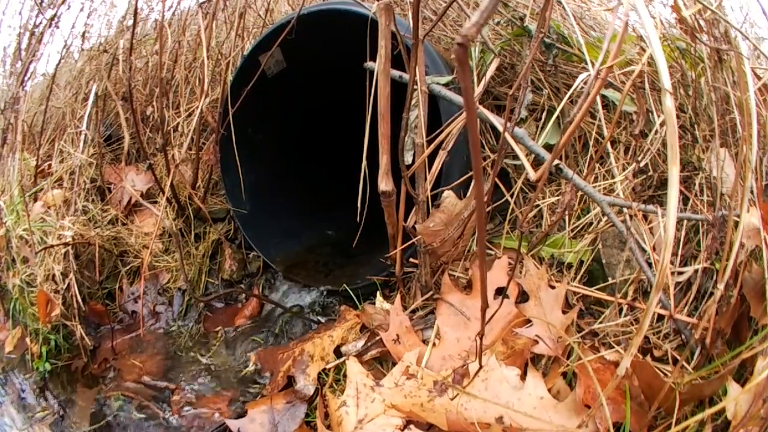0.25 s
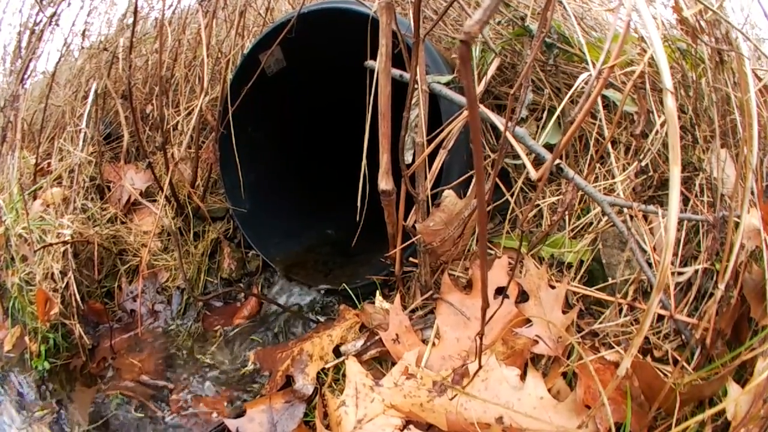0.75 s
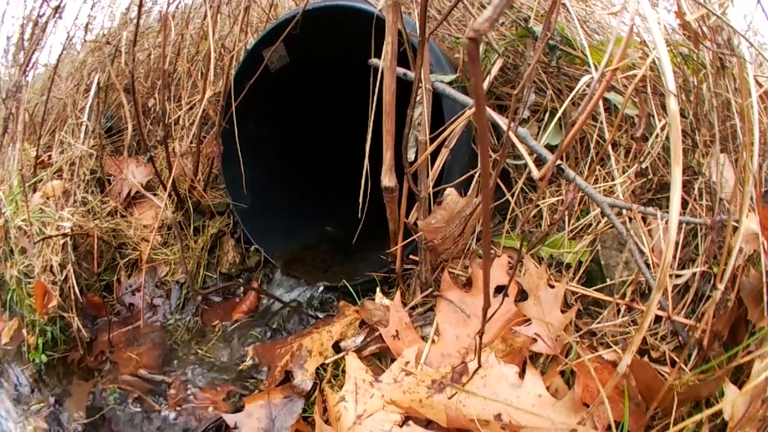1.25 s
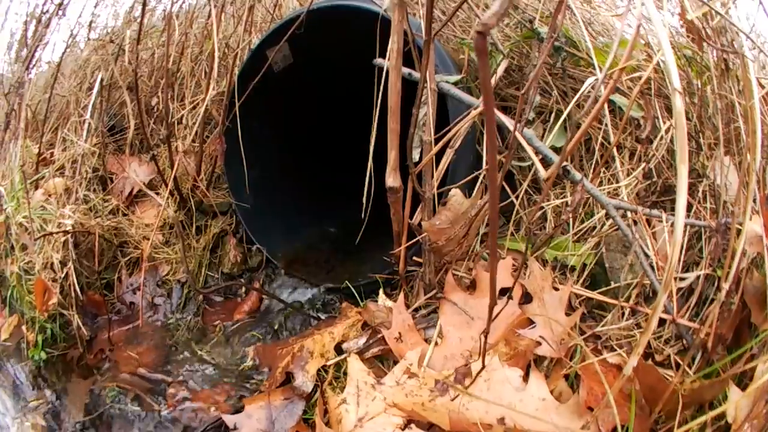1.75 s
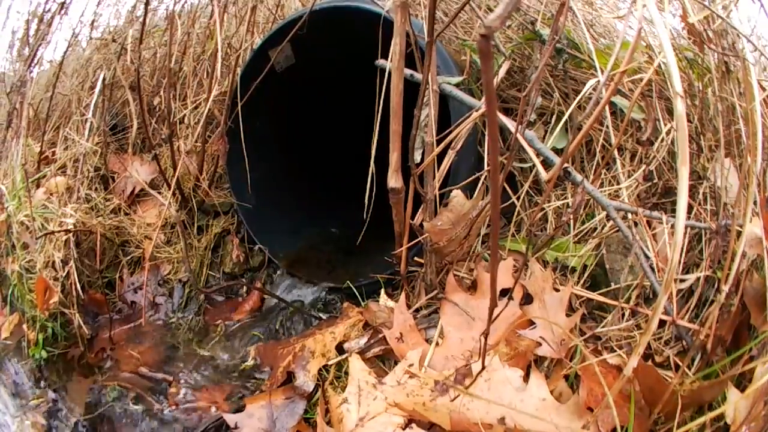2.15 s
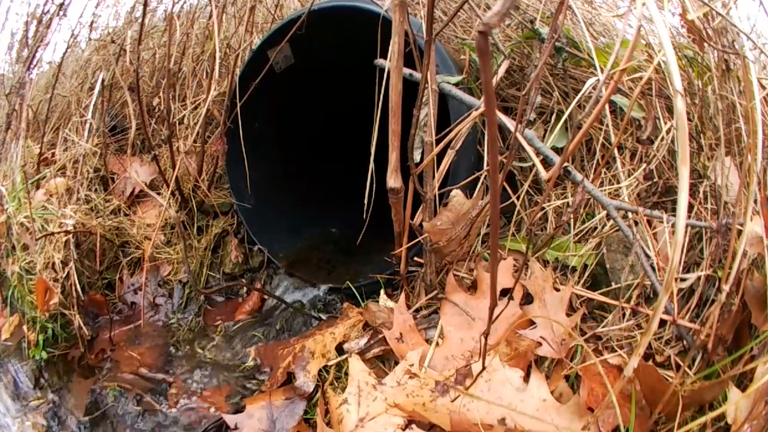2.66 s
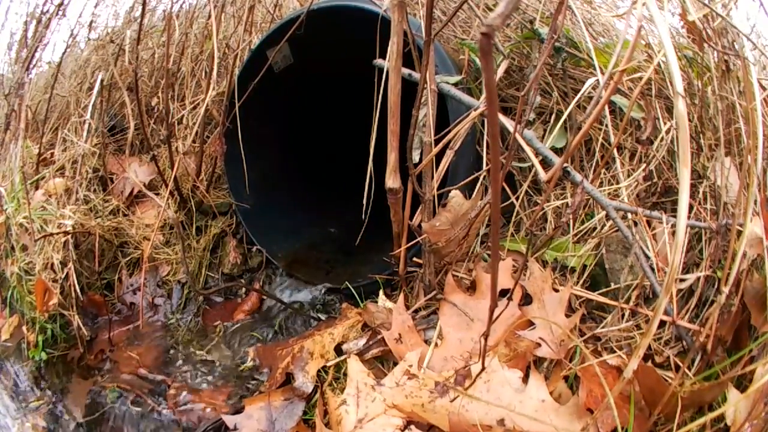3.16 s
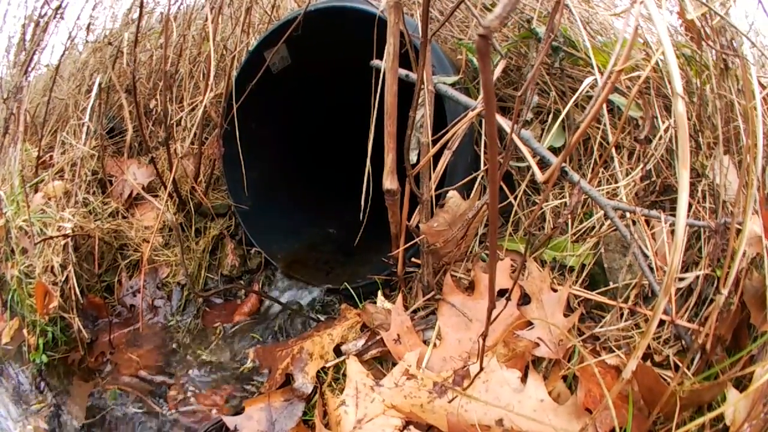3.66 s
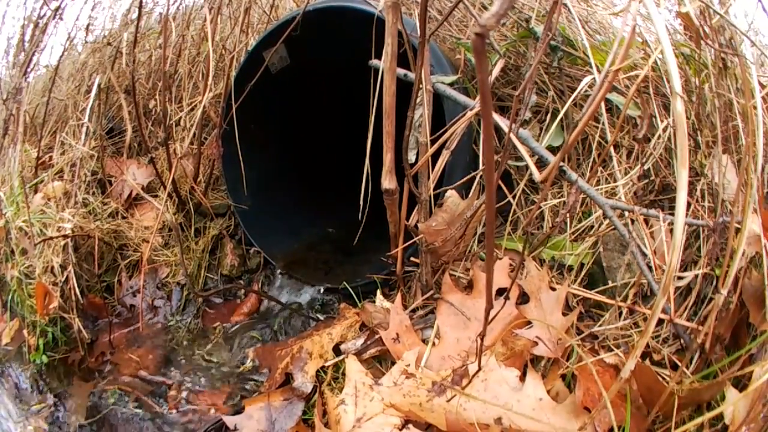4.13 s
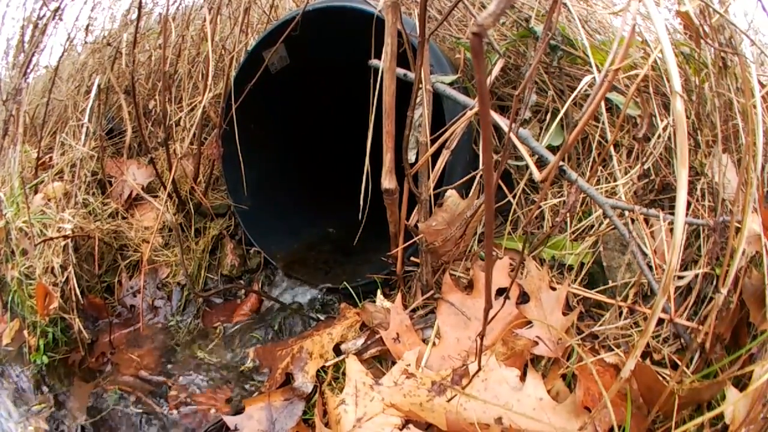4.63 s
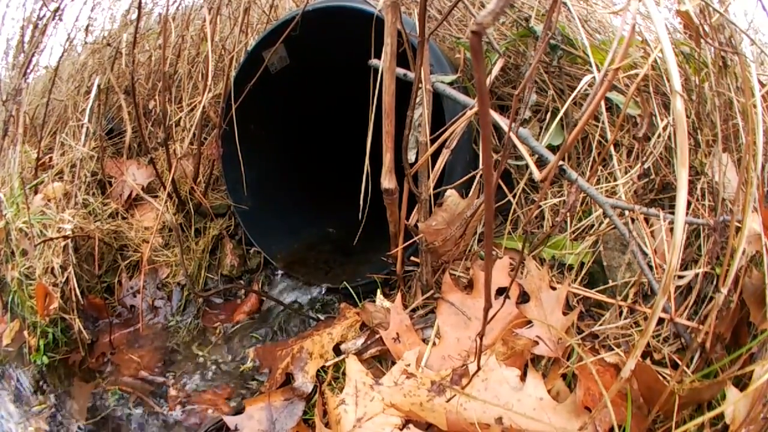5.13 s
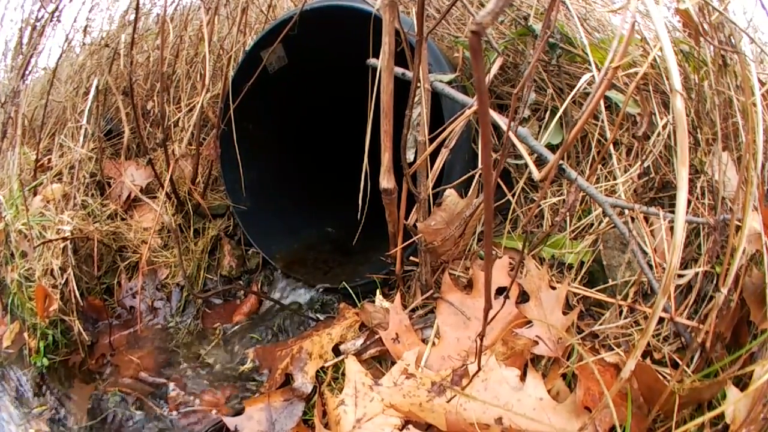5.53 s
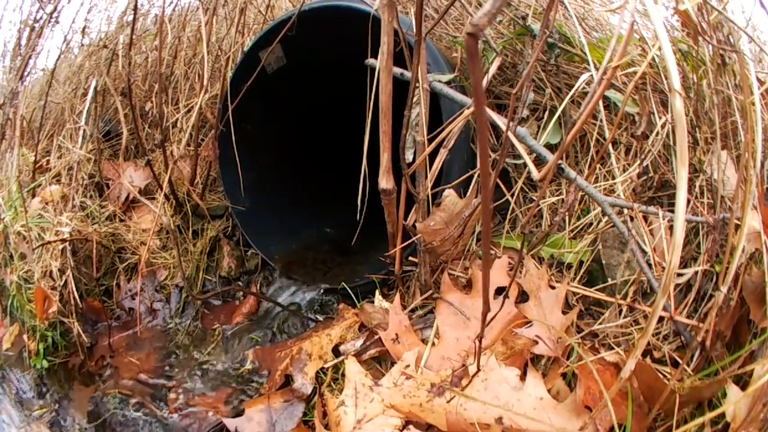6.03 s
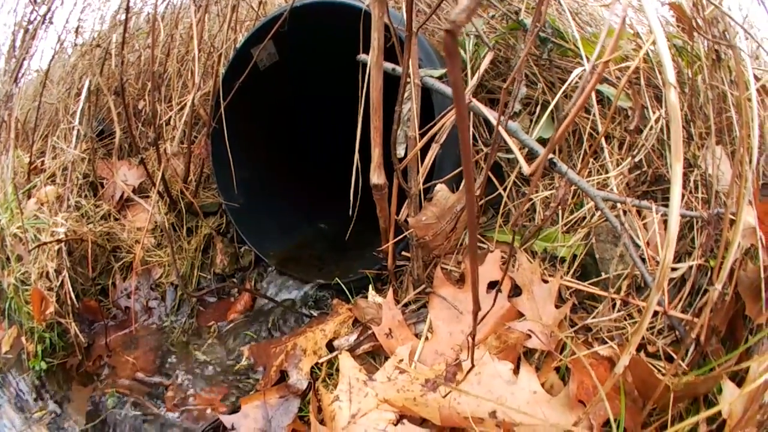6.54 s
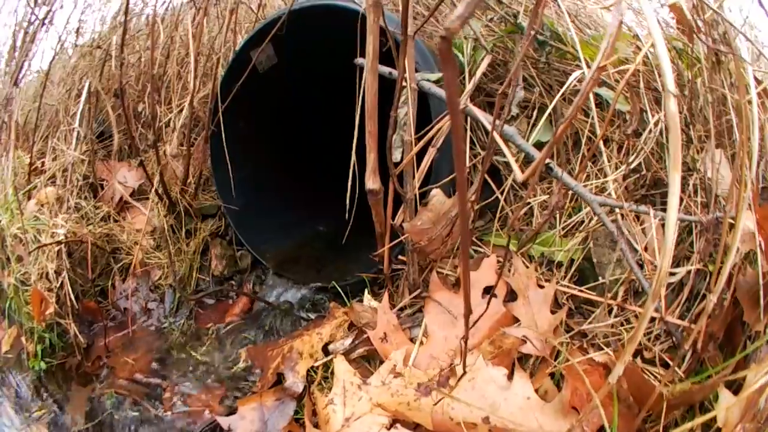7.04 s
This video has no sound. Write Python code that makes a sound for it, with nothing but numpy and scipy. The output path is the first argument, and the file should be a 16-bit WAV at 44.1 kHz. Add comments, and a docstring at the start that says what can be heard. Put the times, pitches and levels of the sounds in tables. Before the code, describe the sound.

A close, light trickle of water gurgles and patters on wet leaves to the left, over a very faint distant rumble.

```python
"""Water runs from a plastic drain pipe over wet leaves into a shallow pool, close by on the left.
Each splash traps air bubbles that ring as damped oscillators; some glide up in pitch until they burst.
Flung droplets tick on the leaves, and the pipe mouth and the bank return short reflections.
A faint rumble, hum and drone come from far away; a few soft, low knocks sound under the water."""
import sys
import numpy as np
from scipy import signal
from scipy.fft import rfft, irfft, next_fast_len
from scipy.io import wavfile
from scipy.ndimage import map_coordinates

SR = 44100
rng = np.random.default_rng(int(sys.argv[2]) if len(sys.argv) > 2 else 0)


def master_out(mix):
    """Clip the mix to full scale and print it as 16-bit PCM to the path in sys.argv[1]."""
    frames = np.transpose(np.atleast_2d(mix))
    ceiling = np.clip(frames, -1, 1)
    pcm = np.round(ceiling * 32767).astype(np.int16)
    wavfile.write(sys.argv[1], SR, pcm)


N = 321489

# Levels in the tables are relative: gains and filters follow.
# Loudest bubbles: start_s, level_db, pitch_hz, t60_s, rise_factor, onset_cycles
LOUD_BUBBLES = [(0.01, -31.5, 4660, 0.0036, 0.033, 1.3), (0.0294, -35.5, 1740, 0.029, 0.15, 0.3),
                (0.0342, -19, 4950, 0.0015, 0.03, 5.5), (0.0413, -37, 900, 0.12, 0.43, 0.43),
                (0.0507, -30, 2890, 0.027, 0.03, 0.3), (0.072, -28, 4670, 0.0055, 0.03, 1.6),
                (0.101, -37, 1214, 0.049, 0.85, 1.2), (0.132, -32, 5080, 0.003, 0.3, 0.3),
                (0.1336, -37.5, 900, 0.026, 0.24, 0.35), (0.156, -32, 3420, 0.005, 0.03, 0.3),
                (0.1755, -26.5, 4570, 0.0032, 0.4, 0.3), (0.1905, -26, 5610.0, 0.0015, 0.03, 1.5),
                (0.2017, -29, 4660, 0.0055, 0.03, 0.3), (0.213, -36.5, 2170, 0.021, 0.028, 0.26),
                (0.2364, -36.5, 810, 0.023, 0.027, 0.23), (0.243, -33.5, 5300, 0.0075, 0.03, 1.5),
                (0.343, -32, 1940, 0.021, 0.15, 0.37), (0.39, -33.5, 1590, 0.013, 0.3, 0.3),
                (0.3977, -33.5, 3340.0, 0.019, 0.15, 0.3), (0.427, -19.5, 4740, 0.0013, 0.03, 0.3),
                (0.455, -42, 1200, 0.04, 0.03, 0.3), (0.462, -25, 6160, 0.0062, 0.03, 0.3),
                (0.4959, -23, 5060.0, 0.0027, 0.03, 6.0), (0.524, -38.5, 1123, 0.054, 0.57, 0.3),
                (0.553, -31, 2440, 0.025, 0.03, 0.26), (0.6858, -25, 4280, 0.0091, 0.03, 1.5),
                (0.7078, -19.5, 4400, 0.002, 0.03, 0.29), (0.7388, -30, 4860, 0.0029, 0.03, 1.5),
                (0.771, -16.5, 5200, 0.0014, 0.03, 1.4), (0.7978, -35.5, 1400, 0.015, 0.03, 0.3),
                (0.829, -22.5, 2600, 0.009, 0.26, 0.36), (0.8303, -25, 6260, 0.0018, 0.79, 0.33),
                (0.8456, -33, 4770, 0.01, 0.15, 1.5), (0.8882, -35, 2460, 0.011, 0.3, 6.0),
                (0.8905, -37.5, 1705, 0.019, 0.32, 6.0), (0.938, -31, 4160, 0.0051, 0.03, 1.3),
                (0.9601, -45, 1295, 0.042, 0.026, 6.0), (0.9902, -30, 3920, 0.0042, 0.44, 0.34),
                (0.9895, -31, 2500, 0.018, 0.03, 0.3), (1.004, -28, 4890.0, 0.003, 0.03, 6.0),
                (1.057, -38, 4900, 0.0053, 0.03, 1.5), (1.0379, -27, 4350, 0.003, 0.03, 0.44),
                (1.038, -24.5, 2600, 0.012, 0.03, 0.66), (1.0674, -27.5, 3470, 0.012, 0.03, 0.3),
                (1.08, -35, 1580.0, 0.011, 0.82, 1.2), (1.099, -35.5, 940, 0.014, 0.28, 0.3),
                (1.109, -41, 1680, 0.03, 0.03, 0.3), (1.123, -27.5, 6370, 0.0051, 0.15, 0.41),
                (1.1445, -30.5, 5100, 0.0028, 0.03, 0.37), (1.146, -39, 1160, 0.016, 0.74, 5.5),
                (1.2003, -35.0, 1770, 0.026, 0.036, 0.3), (1.217, -39.5, 1050, 0.035, 0.03, 0.3),
                (1.2515, -31.5, 5200, 0.011, 0.15, 0.3), (1.2851, -26.5, 5670, 0.0059, 0.15, 1.6),
                (1.304, -38, 1170, 0.03, 0.03, 0.24), (1.3093, -23, 4830, 0.0034, 0.03, 0.31),
                (1.3437, -37, 1610, 0.023, 0.41, 6.0), (1.357, -29, 5550, 0.011, 0.03, 0.33),
                (1.3659, -34.5, 1410, 0.024, 0.03, 0.33), (1.3749, -29, 4210, 0.011, 0.03, 0.3),
                (1.414, -32, 1850, 0.011, 0.03, 0.43), (1.4478, -32, 6400, 0.0026, 0.03, 6.0),
                (1.5072, -28, 5550, 0.0023, 0.03, 0.33), (1.5224, -33.5, 6200, 0.0039, 0.03, 5.4),
                (1.5793, -24, 6400, 0.0017, 0.027, 0.3), (1.6195, -31.5, 5830, 0.0087, 0.15, 6.0),
                (1.6215, -36.5, 2100, 0.025, 0.9, 8.4), (1.638, -22, 4700, 0.0023, 0.15, 0.3),
                (1.68, -37, 1210, 0.0098, 0.03, 0.18), (1.7026, -24, 5740, 0.0021, 0.03, 1.5),
                (1.711, -31.5, 1160, 0.019, 0.034, 0.26), (1.7485, -30, 5000, 0.012, 0.15, 0.3),
                (1.7494, -29, 3010.0, 0.0044, 0.9, 0.33), (1.7577, -28.5, 4780, 0.0033, 0.03, 0.33),
                (1.8213, -29.5, 1280, 0.0042, 0.03, 0.22), (1.825, -45, 1450, 0.053, 1, 8),
                (1.843, -30, 3130, 0.005, 0.03, 0.3), (1.908, -30.5, 6170, 0.007, 0.03, 0.26),
                (1.9566, -20, 4720.0, 0.0027, 0.028, 6.0), (2.0073, -31.5, 2920, 0.0029, 0.03, 6.6),
                (2.035, -31, 6860, 0.0032, 0.03, 6.0), (2.0399, -26, 4580, 0.011, 0.033, 0.3),
                (2.0518, -24.5, 6200, 0.0009, 0.03, 1.5), (2.0703, -36, 2660, 0.0085, 0.03, 6.0),
                (2.123, -31, 3350, 0.012, 0.15, 0.3), (2.143, -33.5, 3570, 0.018, 0.15, 0.3),
                (2.159, -43, 1680, 0.025, 0.027, 5.6), (2.1863, -37, 1690, 0.021, 0.03, 0.3),
                (2.232, -34, 2950, 0.006, 0.03, 0.3), (2.295, -24, 5300, 0.0025, 0.63, 0.38),
                (2.3231, -24, 3480, 0.0033, 0.34, 1.2), (2.3244, -40, 1650, 0.038, 0.03, 0.29),
                (2.3561, -24, 7070, 0.005, 0.024, 0.27), (2.3853, -25.5, 5170, 0.0026, 0.03, 0.3),
                (2.421, -25, 5760, 0.0023, 0.74, 0.41), (2.5037, -32.5, 1745, 0.019, 0.17, 6.0),
                (2.518, -34, 1860, 0.021, 0.15, 0.3), (2.533, -27, 3380, 0.0058, 0.03, 0.38),
                (2.534, -36, 1415, 0.021, 0.03, 0.3), (2.5417, -33, 2300, 0.014, 0.03, 0.3),
                (2.603, -31, 2520, 0.036, 0.03, 0.28), (2.6258, -26.5, 5300, 0.0041, 0.03, 0.36),
                (2.6285, -35, 2070, 0.029, 0.85, 6.0), (2.6383, -37, 6600, 0.0087, 0.03, 0.3),
                (2.6508, -27.5, 6070, 0.005, 0.03, 0.33), (2.6714, -30, 4000, 0.0066, 0.03, 0.3),
                (2.6883, -22.5, 7140, 0.0018, 0.03, 0.3), (2.7154, -31, 3570, 0.01, 0.15, 0.3),
                (2.7317, -19, 4930, 0.0025, 0.35, 1.5), (2.7533, -37, 1018, 0.082, 0.14, 0.34),
                (2.8, -36, 3340.0, 0.017, 0.15, 1.7), (2.8751, -22, 3180, 0.0015, 0.24, 0.24),
                (2.9145, -37, 1900, 0.0087, 0.035, 0.3), (2.92, -39, 1200, 0.0089, 0.3, 0.27),
                (2.948, -25, 3300, 0.013, 0.03, 0.26), (2.97, -24.5, 4600, 0.0025, 0.03, 1.5),
                (2.996, -27, 5760, 0.005, 0.03, 6.0), (3.035, -39, 1530, 0.014, 0.36, 1.4),
                (3.04, -29, 4270, 0.004, 0.03, 0.3), (3.0985, -18, 4250, 0.0023, 0.03, 0.36),
                (3.102, -36, 1610, 0.017, 0.3, 0.3), (3.1353, -24, 3430, 0.01, 0.14, 0.32),
                (3.15, -31, 3800, 0.004, 0.03, 0.3), (3.175, -28, 2600, 0.0046, 0.03, 1.3),
                (3.1752, -23, 4730, 0.0016, 0.8, 0.3), (3.216, -43, 780, 0.03, 0.18, 1.5),
                (3.223, -27, 3300, 0.0059, 0.3, 0.22), (3.2243, -41, 1630, 0.043, 0.26, 1.3),
                (3.229, -30.5, 4640.0, 0.0048, 0.82, 6.0), (3.246, -43, 775, 0.03, 0.17, 1.8),
                (3.255, -38, 1425, 0.018, 0.03, 0.27), (3.2727, -23.5, 4800, 0.0025, 0.03, 0.77),
                (3.342, -34, 6670.0, 0.0058, 0.15, 6.0), (3.368, -36.5, 2230, 0.012, 0.03, 0.3),
                (3.4333, -32, 2720, 0.015, 0.03, 0.3), (3.4733, -38, 1330, 0.015, 0.24, 0.33),
                (3.484, -27, 2840, 0.012, 0.03, 0.3), (3.4916, -33, 5100, 0.011, 0.15, 0.3),
                (3.506, -32, 4480.0, 0.0089, 0.03, 0.3), (3.54, -22, 8650.0, 0.0014, 0.83, 1.5),
                (3.54, -28.5, 3330, 0.0049, 0.03, 0.3), (3.554, -22, 7400, 0.0059, 0.3, 0.37),
                (3.5571, -31, 2260, 0.04, 0.03, 0.59), (3.573, -19, 5000, 0.0021, 0.82, 2.3),
                (3.615, -41, 1900, 0.026, 0.3, 6.0), (3.6777, -36.5, 1210, 0.042, 0.028, 0.3),
                (3.681, -23, 5030, 0.0025, 0.03, 0.23), (3.693, -29, 2820, 0.0052, 0.03, 0.3),
                (3.7134, -31, 3150, 0.0042, 0.14, 1.5), (3.7171, -27, 5070, 0.0024, 0.2, 1.5),
                (3.7463, -24.5, 3100, 0.0085, 0.3, 0.3), (3.7556, -26.5, 6070, 0.0057, 0.14, 1.5),
                (3.7836, -34.5, 1355, 0.053, 0.99, 0.27), (3.832, -30.5, 2780, 0.006, 0.03, 0.3),
                (3.8454, -31, 1790, 0.03, 0.15, 0.43), (3.8592, -36, 3700, 0.013, 0.15, 6.0),
                (3.862, -41, 1250, 0.03, 0.44, 0.3), (3.9246, -31.5, 890, 0.0078, 0.03, 1.6),
                (3.94, -32, 5550, 0.0056, 0.03, 6.0), (3.9791, -20.5, 5560, 0.0024, 0.03, 2),
                (3.9897, -29, 4770, 0.0089, 0.15, 0.3), (3.9905, -24.5, 2820, 0.0037, 0.03, 0.33),
                (4.0233, -32.5, 3920, 0.015, 0.3, 0.3), (4.0255, -41, 757, 0.087, 0.028, 0.28),
                (4.0254, -32, 4990, 0.004, 0.73, 0.3), (4.0524, -33, 5370, 0.0031, 0.03, 1.5),
                (4.0624, -38, 1670.0, 0.029, 0.3, 0.3), (4.085, -33.5, 2280, 0.018, 0.03, 0.38),
                (4.132, -28, 6400, 0.0013, 0.99, 6.0), (4.1344, -20, 3870, 0.0029, 0.14, 0.22),
                (4.135, -34.0, 1590, 0.038, 0.13, 0.38), (4.232, -40, 2570, 0.019, 0.03, 6.0),
                (4.269, -33, 1366, 0.032, 0.58, 0.51), (4.3672, -35, 2000, 0.014, 0.26, 0.34),
                (4.372, -26, 5800, 0.0012, 0.13, 6.0), (4.4481, -42, 1220.0, 0.035, 0.03, 4.8),
                (4.4675, -36, 1040, 0.022, 0.03, 0.33), (4.4824, -31.5, 4140, 0.0088, 0.03, 0.3),
                (4.5086, -29, 6450.0, 0.0043, 0.03, 1.5), (4.5443, -33, 5060, 0.0057, 0.49, 0.34),
                (4.546, -25.5, 2740, 0.021, 0.03, 0.23), (4.5594, -30, 3270, 0.019, 0.03, 0.33),
                (4.5748, -17.5, 3150, 0.0019, 0.03, 0.093), (4.609, -29, 5080, 0.003, 0.03, 0.3),
                (4.6222, -31.5, 2170, 0.01, 0.03, 0.27), (4.6382, -30, 4470, 0.0041, 0.27, 0.3),
                (4.6717, -30.5, 2750, 0.011, 0.03, 6.0), (4.6728, -22.5, 6340, 0.0051, 0.44, 0.37),
                (4.7164, -32.5, 3180, 0.011, 0.26, 6.0), (4.7193, -35.5, 4720.0, 0.0082, 0.03, 1.5),
                (4.7594, -27.5, 4450, 0.0039, 0.78, 6.0), (4.7936, -28.5, 3880, 0.0024, 0.03, 6.0),
                (4.813, -27.5, 4940, 0.004, 0.39, 6.0), (4.8613, -27.5, 3100, 0.0038, 0.03, 1.5),
                (4.8792, -27, 4850, 0.0031, 0.83, 0.3), (4.9253, -22, 4200, 0.0025, 0.03, 1.3),
                (4.946, -30, 2670, 0.006, 0.03, 0.3), (4.9787, -27.5, 3300, 0.0046, 0.14, 6.0),
                (4.996, -38, 1100, 0.014, 0.03, 0.33), (5.0044, -29, 5030, 0.0019, 0.79, 0.25),
                (5.005, -26.5, 2380, 0.01, 0.15, 0.3), (5.039, -23, 4800, 0.0042, 0.03, 0.27),
                (5.0393, -29.5, 1480, 0.0049, 0.16, 1.5), (5.0421, -25.5, 2730, 0.0039, 0.81, 6.0),
                (5.123, -29.5, 4800, 0.0085, 0.26, 0.3), (5.1661, -25.5, 3460, 0.019, 1, 0.3),
                (5.1866, -28.5, 2580, 0.012, 0.96, 0.13), (5.2406, -26, 5100, 0.0092, 0.13, 0.26),
                (5.241, -36.5, 1080, 0.016, 0.03, 0.42), (5.26, -29, 4200, 0.0083, 0.03, 0.33),
                (5.2905, -34.5, 1650, 0.014, 0.3, 0.94), (5.3334, -30, 5200, 0.011, 0.15, 0.3),
                (5.3368, -26.5, 1780, 0.0058, 0.03, 0.46), (5.358, -22, 3280, 0.0036, 0.34, 5.4),
                (5.4036, -27, 6050, 0.0058, 0.9, 0.3), (5.4032, -28, 2650, 0.028, 0.16, 0.3),
                (5.4217, -22.5, 5800, 0.0022, 0.42, 1.7), (5.438, -30, 7200, 0.008, 0.03, 0.3),
                (5.4735, -20, 4460, 0.0064, 0.15, 0.37), (5.493, -28, 2660.0, 0.012, 0.03, 0.34),
                (5.499, -30, 4560.0, 0.0082, 0.55, 6.0), (5.5758, -40, 1150, 0.014, 0.028, 6.7),
                (5.6452, -37, 1720, 0.01, 0.03, 6.0), (5.645, -25, 3340, 0.0027, 0.03, 0.35),
                (5.693, -27, 3300, 0.0092, 0.19, 0.3), (5.7125, -40, 1560, 0.03, 0.03, 6.0),
                (5.7131, -30, 4400.0, 0.0037, 0.9, 1.5), (5.729, -27.5, 5800, 0.0043, 0.15, 0.3),
                (5.7507, -39, 1370, 0.032, 0.4, 6.0), (5.7525, -32, 6500, 0.0087, 0.03, 0.3),
                (5.7798, -40.5, 1240, 0.051, 0.027, 5.4), (5.7819, -23, 6230, 0.0028, 0.03, 6.0),
                (5.7844, -35, 2020.0, 0.0087, 0.55, 6.0), (5.828, -31.5, 3150, 0.027, 0.25, 0.26),
                (5.838, -36, 1610, 0.028, 0.27, 0.34), (5.8382, -24, 4890.0, 0.0017, 0.9, 0.3),
                (5.891, -26.5, 7100, 0.0052, 0.15, 6.0), (5.9703, -31, 3820, 0.0027, 0.28, 1.5),
                (5.9974, -27, 5800, 0.0043, 0.03, 1.5), (6.083, -29, 5150, 0.004, 0.03, 0.3),
                (6.1028, -32, 2050, 0.024, 0.03, 0.3), (6.109, -26, 5800, 0.0027, 0.15, 1.5),
                (6.148, -34.5, 1640, 0.019, 0.49, 6.0), (6.181, -31.0, 6300, 0.0057, 0.03, 1.4),
                (6.1875, -32, 2280, 0.013, 0.34, 0.28), (6.2045, -33.5, 1460, 0.024, 0.03, 0.22),
                (6.215, -28, 6000, 0.0063, 0.03, 0.3), (6.239, -37, 1650, 0.02, 0.46, 6.0),
                (6.2482, -28.5, 2330, 0.019, 0.03, 0.32), (6.2486, -24.5, 5470, 0.003, 0.15, 0.35),
                (6.253, -34, 1526, 0.027, 0.5, 5.5), (6.2978, -33, 2570, 0.0059, 0.03, 0.34),
                (6.299, -22.5, 4950, 0.0084, 0.03, 2.3), (6.331, -35, 6200, 0.0063, 0.03, 6.0),
                (6.3672, -29, 1970, 0.0056, 0.03, 0.27), (6.455, -33, 2530, 0.026, 0.03, 0.37),
                (6.4741, -27, 2670, 0.012, 0.03, 0.35), (6.4763, -34.5, 1520, 0.033, 0.38, 0.36),
                (6.5198, -28, 3110.0, 0.014, 0.98, 6.6), (6.522, -32.5, 1400, 0.044, 0.03, 0.37),
                (6.5298, -27, 4000, 0.0036, 0.15, 6.0), (6.546, -30, 3360, 0.005, 0.03, 0.3),
                (6.5625, -36, 6450.0, 0.0036, 0.03, 6.0), (6.5663, -29, 4150, 0.006, 0.03, 0.3),
                (6.587, -32, 4150, 0.0097, 0.03, 1.5), (6.597, -41, 1040, 0.024, 0.15, 1.5),
                (6.615, -26, 6240, 0.0087, 0.03, 0.33), (6.621, -32.5, 3340.0, 0.018, 0.03, 0.3),
                (6.6502, -23.5, 5240, 0.0054, 0.03, 0.3), (6.6948, -33.5, 2590, 0.014, 0.03, 0.3),
                (6.7603, -29, 8000, 0.0058, 0.03, 0.3), (6.847, -28, 1140, 0.055, 0.36, 0.21),
                (6.8467, -28, 5200, 0.0085, 0.33, 0.3), (6.8712, -25.5, 4930, 0.0018, 0.03, 1.5),
                (6.9297, -30, 3530, 0.019, 0.78, 0.3), (6.929, -26, 5370, 0.0021, 0.9, 0.33),
                (6.956, -39.5, 1280, 0.031, 0.4, 0.33), (6.9662, -28, 2400.0, 0.0048, 0.35, 1.5),
                (6.97, -26.5, 6340.0, 0.0018, 0.03, 6.0), (6.9819, -24, 6140, 0.0019, 0.03, 0.3),
                (7.0269, -28, 1370, 0.0076, 0.03, 0.34), (7.0607, -28, 3120, 0.0054, 0.03, 0.3),
                (7.084, -27, 5130, 0.0024, 0.03, 0.27), (7.139, -26.5, 3950, 0.0031, 0.68, 1.5),
                (7.161, -22.5, 6230.0, 0.0021, 0.63, 0.28), (7.1878, -31.5, 915, 0.025, 0.5, 0.3),
                (7.208, -34, 2040, 0.0053, 0.03, 6.0), (7.2563, -17.5, 6600, 0.0015, 0.03, 6.0)]
# Strength of the flow over the leaves: time_s, level_db
FLOW_STRENGTH = [(0.0, -50), (0.45, -45), (0.95, -51.5), (1.42, -46), (2.17, -47), (2.39, -53),
                 (2.54, -47.5), (3.53, -48.5), (3.69, -45.5), (4.02, -49), (4.2, -48), (4.69, -47.5),
                 (5.28, -47.5), (5.68, -46), (6.09, -46), (6.42, -43), (6.78, -47.5), (7.29, -44)]
# Bubbles that glide to the surface and burst: start_s, level_db, pitch_hz, length_s, climb_octaves
GLIDING_BUBBLES = [(0.548, -31.5, 3077, 0.0067, 1.55), (0.739, -45.5, 1000, 0.016, 0.52),
                   (0.951, -34, 2280, 0.0067, 1.2), (1.014, -34, 2450, 0.007, 1.3),
                   (1.934, -30.5, 1534, 0.0083, 0.84), (2.694, -38.5, 2740, 0.006, 0.75),
                   (2.855, -39, 3100, 0.0044, 0.75), (2.9685, -30.5, 1090, 0.0036, 1.1),
                   (3.3444, -38, 2540, 0.013, 0.54), (3.956, -39, 2980, 0.0055, 0.44),
                   (4.171, -31, 2860, 0.0043, 1.6), (5.713, -29, 2720, 0.0028, 1.3),
                   (6.083, -30, 1600, 0.0087, 0.55), (6.367, -32, 1670, 0.0084, 0.51),
                   (6.602, -28.5, 4020, 0.006, 0.56), (6.639, -38, 960, 0.015, 0.5),
                   (7.159, -39.5, 1250, 0.007, 0.84)]
# Loudest droplets striking the leaves: start_s, level_db
LOUD_DROPLETS = [(0.592, -24), (0.6374, -24.5), (0.6543, -19.5), (0.691, -22), (0.769, -32), (0.867, -19),
                 (0.9897, -24), (1.037, -22), (1.062, -28), (1.1004, -23.5), (1.1233, -32), (1.2895, -23),
                 (1.5475, -24.5), (1.5786, -26.5), (1.6787, -26), (1.8835, -23), (2.0238, -29),
                 (2.419, -26), (2.4428, -34), (2.4587, -17.5), (2.6873, -20.5), (2.9695, -26),
                 (3.034, -23.5), (3.0659, -28), (3.19, -24), (3.483, -24), (3.5389, -21), (3.5754, -25),
                 (4.3311, -24.5), (4.3566, -24), (4.4032, -24), (4.412, -24), (4.6172, -23.5), (4.676, -30),
                 (4.8355, -22), (4.8474, -24), (5.004, -24), (5.1068, -28), (5.329, -33), (5.6875, -25),
                 (5.889, -19), (6.2198, -25), (6.299, -20.5), (6.4083, -18.5), (6.4267, -26), (6.464, -23),
                 (6.9656, -29), (7.0274, -24.5), (7.0354, -25), (7.0605, -13), (7.1546, -20)]
# Swells of the far hum: middle_s, half_width_s, level_db
HUM_SWELLS = [(0.4, 0.14, -61), (0.89, 0.25, -51.5), (1.47, 0.2, -58), (2.32, 0.34, -57.5)]
# Soft, low knocks: start_s, level_db
LOW_KNOCKS = [(1.635, -48), (1.679, -56), (1.704, -58), (1.734, -56), (1.744, -54), (1.779, -55),
              (1.819, -57)]
# Spectrum of splashing water: frequency_hz, gain_db
WASH_SPECTRUM = [(300, -21), (600, -39.5), (850, 0.5), (1300, -14.5), (2200, -5), (4800, -4), (7000, -7),
                 (9000, -13), (16000, -16.5)]
# Spectrum of an impact on a wet leaf: frequency_hz, gain_db
TICK_SPECTRUM = [(500, -54), (1500, -16), (3000, -0.5), (6000, 9.5), (9000, 7), (12000, 7.5), (16000, 5.5)]
# Radiation of the shallow pool, weak in the bass: frequency_hz, gain_db
POOL_RADIATION = [(200, -45.5), (450, -4.5), (640, -1), (820, -1.5), (1150, 0.7), (1700, 0.2), (2600, 0.3),
                  (5000, 0)]
# Reflection from the pipe mouth and bank: frequency_hz, gain_db
BANK_SPECTRUM = [(300, -13), (1200, 9), (5000, 1.5), (14000, -1.5)]
# Spectrum of the far rumble: frequency_hz, gain_db
RUMBLE_SPECTRUM = [(20, -26), (35, -23), (55, -17), (75, -7.5), (110, 3.5), (180, 0), (270, -7),
                   (320, -15.5), (600, -14.5), (1200, -39), (4000, -58)]
# Spectrum of the rumble's slow swell: frequency_hz, gain_db
RUMBLE_SWELL_SPECTRUM = [(20, -44), (60, -19), (120, -7.5), (190, 0), (280, -1.5), (330, -9), (600, -12),
                         (1200, -48), (4000, -65)]
# Spectrum of the deep drone: frequency_hz, gain_db
DRONE_SPECTRUM = [(20, -33), (55, -12), (72, 6), (90, -1), (140, -20), (400, -61)]
# Spectrum of a knock: frequency_hz, gain_db
KNOCK_SPECTRUM = [(60, -22), (150, 0), (280, -2), (450, -8), (800, -17), (2000, -50)]
# Bands that the ditch and the microphone housing lift or absorb: centre_hz, width_hz, gain_db
DITCH_BANDS = [(1310, 160, 2.5), (1794, 73, 5.5), (1893, 105, -4.5), (2300, 167, -5), (2880, 30, -1),
               (3080, 46, -9.5), (3310, 60, 3), (3995, 58, -14), (4190, 62, 3), (4880, 310, 3),
               (6100, 210, 1.5), (7735, 180, -18), (8730, 140, -8.5)]
# Level difference between the channels: frequency_hz, left_minus_right_db
BALANCE = [(60, 7.5), (200, 10), (380, 5), (700, 7.5), (1300, 10.5), (2400, 10), (4400, 11), (8000, 12),
           (15000, 14)]

PLOP_SPREAD_DB, SPRAY_SPREAD_DB = 12, 17  # range of random strength among grains
PINCH_GAIN, PINCH_SHARPEN, PINCH_CYCLES = 0.8, 0.16, 2.6  # a new bubble starts loud and sharp
RISE_ACCELERATION, MAX_RISE_FACTOR = 1.3, 0.85


def amp(db):
    """Amplitude ratio of a level in decibels."""
    return 10 ** (np.asarray(db) / 20)


def unit(x):
    """Normalisation to an rms of 1."""
    return x / np.sqrt(np.mean(x ** 2) + 1e-20)


def along(points, hz):
    """Interpolation of a spectrum on a logarithmic frequency axis."""
    frequencies, values = np.transpose(points)
    return np.interp(np.log(hz + 1), np.log(frequencies + 1), values)


def wobble(rate):
    """Smooth random modulation: a spline through rate knots a second."""
    knots = rng.standard_normal(int(N * rate / SR) + 4)
    return map_coordinates(knots, [np.arange(N) * rate / SR])


def swell(middle_s, half_width_s):
    """Gaussian envelope of height 1."""
    return np.exp(-((np.arange(N) / SR - middle_s) / half_width_s) ** 2)


def coloured(x, gain_db):
    """Minimum-phase filtering by gain_db(hz), built by folding the cepstrum."""
    m = 2 * next_fast_len(N // 2 + SR // 4)
    cepstrum = irfft(np.log(amp(gain_db(np.fft.rfftfreq(m, 1 / SR)))), m)
    cepstrum[1:m // 2] *= 2
    cepstrum[m // 2 + 1:] = 0
    return irfft(rfft(x, m) * np.exp(rfft(cepstrum)), m)[..., :N]


def shaped(x, spectrum):
    """Filtering by a tabulated spectrum."""
    return coloured(x, lambda hz: along(spectrum, hz))


def placed(start_s, grains):
    """Superposition of grains, one a row, each at its start time."""
    at = np.round(start_s * SR).astype(int)[:, None] + np.arange(grains.shape[1])
    return np.bincount(at.ravel(), grains.ravel(), N)[:N]


def staggered(offsets):
    """Stratified timing: one start in each equal slot of the scene, in seconds."""
    return (np.arange(len(offsets)) + offsets) / len(offsets) * (N - 1) / SR


def ring(hz, t60, rise, onset_cycles, size):
    """Damped oscillation of bubbles: pitch settles after pinch-off, then climbs near the surface."""
    t = np.arange(size) / SR
    hz, t60, rise = hz[:, None], t60[:, None], rise[:, None]
    pinch = np.exp(-t * hz / PINCH_CYCLES) / (1 + onset_cycles)
    age = np.minimum(t / t60, 1)
    attack = 1 - np.exp(-t * hz / onset_cycles)
    envelope = np.exp(-np.log(1000) * t / t60) * attack * (1 + PINCH_GAIN * pinch)
    pitch = hz * (1 + PINCH_SHARPEN * pinch + rise * age * (1 + RISE_ACCELERATION * age))
    phase = 2 * np.pi * np.cumsum(pitch, axis=1) / SR
    return envelope / envelope.max(axis=1, keepdims=True) * np.sin(phase)


def snaps(count, t60, size=256):
    """Broadband transients of peak 1, as when a film of water breaks."""
    burst = rng.standard_normal((count, size)) * np.exp(-np.log(1000) * np.arange(size) / SR / t60)
    return burst / np.abs(burst).max(axis=1, keepdims=True)


def jostle(depth_db=2.2):
    """Amplitude modulation by the rushing water makes a ring ragged."""
    return amp(depth_db * np.tanh(wobble(520)))


def near_bubbles(bubbles, ring_db, snap_db):
    """Pinch-off excites each bubble's resonance; the more abrupt the onset, the stronger the snap."""
    start_s, db, hz, t60, rise, onset = bubbles.T
    peak, onset = amp(db)[:, None], onset[:, None]
    rings = placed(start_s, peak * ring(hz, t60, rise, onset, size=2600))
    snapping = placed(start_s, peak / (1 + onset) * snaps(len(start_s), t60=0.0026))
    return amp(ring_db) * jostle() * rings + amp(snap_db) * shaped(snapping, WASH_SPECTRUM)


def ring_time(hz):
    """Damping grows with frequency: the t60 in seconds is shorter for small, high bubbles."""
    return 0.0164 * (hz / 2000) ** -1.33


def shed_bubbles(within_s, level_db, max_octaves):
    """Fragmentation: each loud bubble sheds a smaller, higher one. Returns bubble rows."""
    parent_s, parent_db, parent_hz, _, _, onset = np.transpose(LOUD_BUBBLES)
    when, smaller, strength, lift = rng.random((len(parent_s), 4)).T
    start_s = parent_s + within_s * when ** 2
    db = parent_db + level_db + 6 * (strength - 0.5)
    hz = parent_hz * 2 ** (max_octaves * smaller)
    return np.transpose([start_s, db, hz, 0.5 * ring_time(hz), MAX_RISE_FACTOR * lift ** 2, onset])


def lesser_bubbles(low_hz, high_hz, db_per_octave, count):
    """Chance entrainment of air: the smaller the bubble, the harder it starts. Returns bubble rows."""
    when, smaller, strength, life, lift = rng.random((count, 5)).T
    hz = low_hz * (high_hz / low_hz) ** smaller
    db = -43.5 + db_per_octave * np.log2(hz / 2000) + 2 * (2 * strength - 1)
    t60 = ring_time(hz) * 2 ** (life - 0.5)
    return np.transpose([staggered(when), db, hz, t60, MAX_RISE_FACTOR * lift, np.ones(count)])


def surges(splash_db, settle_s, churn_db):
    """Agitation in dB jumps with each loud bubble and relaxes exponentially, over a random churn."""
    start_s = np.array(LOUD_BUBBLES)[:, 0]
    fade = np.exp(-np.arange(SR // 15) / SR / settle_s)
    splashes = np.tanh(placed(start_s, np.tile(fade, (len(start_s), 1))))
    churn = np.tanh(0.41 * wobble(55) + 0.5 * wobble(150))
    return splash_db * splashes + churn_db * churn


def flow(depth=0.47):
    """Slow amplitude modulation: the small bubbling follows the strength of the flow."""
    level_db = np.interp(np.arange(N) / SR, *np.transpose(FLOW_STRENGTH))
    return amp(depth * (level_db - level_db.mean()))


def swarm(surge_db, spread_db, band_hz, cycles, rise, count, size):
    """Many small resonators add incoherently; smaller bubbles ring higher and shorter."""
    when, smaller, life, lift, strength = rng.random((count, 5)).T
    start_s = staggered(when)
    low_hz, high_hz = band_hz
    hz = low_hz * (high_hz / low_hz) ** smaller
    t60 = cycles * 2 ** (2 * life - 1) / hz
    db = spread_db * strength ** 2 + surge_db[(start_s * SR).astype(int)]
    peak = amp(db) * (hz / low_hz) ** 0.38  # short rings start harder
    rings = ring(hz, t60, rise * lift * life, onset_cycles=1.0, size=size)
    return unit(placed(start_s, peak[:, None] * rings))


def spray(surge_db, count):
    """Impact noise of fine spray pattering on the leaves."""
    when, strength = rng.random((count, 2)).T
    peak = amp(SPRAY_SPREAD_DB * strength ** 3)[:, None]
    ticks = placed(when * N / SR, peak * snaps(count, t60=0.0077))
    return unit(shaped(ticks * amp(surge_db), TICK_SPECTRUM))


def spatter(count):
    """Impact without resonance: small drops smack the water and trap no air."""
    when, strength = rng.random((count, 2)).T
    peak = amp(SPRAY_SPREAD_DB * strength ** 4)[:, None]
    ticks = placed(when * (N - 1) / SR, peak * snaps(count, t60=0.0023))
    return unit(shaped(ticks, WASH_SPECTRUM))


def water():
    """Bubbles and impacts superpose and radiate from the pool, over a surging wash of noise."""
    shed = shed_bubbles(within_s=0.012, level_db=-10.5, max_octaves=1.08)
    lesser = lesser_bubbles(low_hz=1218, high_hz=7160, db_per_octave=5.5, count=130)
    surge = surges(splash_db=14, settle_s=0.0014, churn_db=9)
    hollow = amp(-75) * swarm(0.5 * surge, PLOP_SPREAD_DB, band_hz=(420, 720),
                              cycles=9, rise=0.3, count=130, size=2600)
    plops = amp(-76.5) * swarm(0.5 * surge, PLOP_SPREAD_DB, band_hz=(580, 1020),
                               cycles=4.6, rise=0.25, count=300, size=2600)
    gurgle = amp(-58) * swarm(0.44 * surge, PLOP_SPREAD_DB, band_hz=(860, 2104),
                              cycles=25, rise=1.3, count=900, size=2000)
    tinkle = amp(-52.5) * swarm(surge, SPRAY_SPREAD_DB, band_hz=(2376, 6950),
                                cycles=27, rise=1.17, count=2800, size=480)
    fizz = amp(-56) * swarm(1.03 * surge, SPRAY_SPREAD_DB, band_hz=(7900, 15900),
                            cycles=43, rise=0.1, count=2400, size=256)
    patter = amp(-56.5) * spray(0.27 * surge, count=2200)
    wash = amp(-64 + 1.48 * surge) * unit(shaped(rng.standard_normal(N), WASH_SPECTRUM))
    splashes = near_bubbles(np.vstack([LOUD_BUBBLES, shed, lesser]), ring_db=-0.17, snap_db=-2.5)
    splashes += amp(-0.5) * glides(low_hz=1100, high_hz=4600, cycles=15, faint_count=28)
    splashes += droplets(centre_hz=11740, ping_db=-3.8, slap_db=-7.2, faint_count=8)
    smacks = amp(-53) * spatter(count=1200)
    bubbling = flow() * (hollow + plops + gurgle + tinkle + smacks)
    return shaped(splashes + bubbling + fizz + patter, POOL_RADIATION) + wash


def bank_reflections(x, t60, apart_db, hop=2048):
    """Scattering off the pipe mouth and bank, along paths that change as the splashes move about."""
    starts = np.arange(0, N, hop)
    padded = np.pad(x, (0, 2 * hop))
    frames = padded[starts[:, None] + np.arange(2 * hop)] * signal.get_window("hann", 2 * hop)
    t = np.arange(2 * hop) / SR
    fade = np.exp(-np.log(1000) * t / t60) * (1 - np.exp(-t / 0.00028))
    # left and right share nearly the same paths
    paths = rng.standard_normal(frames.shape) + amp(apart_db) * rng.standard_normal((2, *frames.shape))
    echoes = signal.fftconvolve(frames[None], paths * fade / np.linalg.norm(fade), axes=2)
    return shaped(np.array([placed(starts / SR, side) for side in echoes]), BANK_SPECTRUM)


def far_rumble():
    """Low noise, partly coherent between the channels, wavers; a second band swells and recedes."""
    air = rng.standard_normal(N) + 0.47 * rng.standard_normal((2, N))
    resting = amp(-66.5 + 2.1 * wobble(13)) * unit(shaped(air, RUMBLE_SPECTRUM))
    envelope = amp(-68.5 + 2.1 * wobble(12)) * swell(middle_s=1.4, half_width_s=2.76)
    return resting + envelope * unit(shaped(rng.standard_normal(N), RUMBLE_SWELL_SPECTRUM))


def far_drone():
    """Narrow-band noise gives a deep drone that swells once, near the end."""
    level_db = -79 + 8.5 * swell(middle_s=6.93, half_width_s=0.3)
    return amp(level_db) * unit(shaped(rng.standard_normal(N), DRONE_SPECTRUM))


def glides(low_hz, high_hz, cycles, faint_count, size=1100):
    """A bubble's resonance sweeps upward as it is carried to the surface, and stops as it bursts."""
    when, smaller, strength, lift = rng.random((faint_count, 4)).T
    faint_hz = low_hz * (high_hz / low_hz) ** smaller
    faint_db = -43.5 + 6 * (strength + smaller - 1)
    faint = np.transpose([staggered(when), faint_db, faint_hz, cycles / faint_hz, (1 + lift) / 2])
    start_s, db, hz, length_s, octaves = np.vstack([GLIDING_BUBBLES, faint]).T
    progress = np.minimum(np.arange(size) / SR / length_s[:, None], 1)
    envelope = np.sqrt(np.abs(np.sin(np.pi * progress))) * np.exp(-progress)
    pitch = hz[:, None] * 2 ** (octaves[:, None] * progress ** 1.5)
    chirps = envelope / envelope.max() * np.sin(2 * np.pi * np.cumsum(pitch, axis=1) / SR)
    return jostle() * placed(start_s, amp(db)[:, None] * chirps)


def far_hum(start_hz, climb_hz_per_s):
    """A sine tone, randomly modulated in level and frequency, creeps upward as it comes and goes."""
    swells = sum(amp(db) * swell(middle, width) for middle, width, db in HUM_SWELLS)
    waver = amp(-4 + 1.6 * wobble(12.8))
    hz = start_hz + climb_hz_per_s * np.arange(N) / SR + 1.6 * wobble(10.15)
    return swells * waver * np.sin(2 * np.pi * np.cumsum(hz) / SR)


def droplets(centre_hz, ping_db, slap_db, faint_count):
    """The impact of a larger drop on a wet leaf gives a slap and a high, heavily damped ping."""
    faint_s = rng.random(faint_count) * (N - 1) / SR
    faint_db = -36 + 8 * rng.standard_normal(faint_count)
    start_s, db = np.vstack([LOUD_DROPLETS, np.transpose([faint_s, faint_db])]).T
    hz = centre_hz * 2 ** (0.29 * rng.standard_normal(len(start_s)))
    peak = amp(db)[:, None]
    pings = placed(start_s, peak * ring(hz, 14 / hz, np.zeros_like(hz), onset_cycles=0.98, size=256))
    slaps = shaped(placed(start_s, peak * snaps(len(start_s), t60=0.003)), TICK_SPECTRUM)
    return amp(ping_db) * pings + amp(slap_db) * slaps


def knocking():
    """Transients filtered to the bass make a short run of soft knocks."""
    start_s, db = np.transpose(LOW_KNOCKS)
    bursts = placed(start_s, amp(db)[:, None] * snaps(len(start_s), t60=0.014))
    thuds = shaped(bursts, KNOCK_SPECTRUM)
    return amp(db.max()) * thuds / np.abs(thuds).max()


def ditch_db(hz):
    """Resonance and absorption of the ditch and microphone housing, as Gaussian peaks and dips."""
    return sum(db * np.exp(-((hz - centre) / width) ** 2) for centre, width, db in DITCH_BANDS)


def scene():
    """Direct, reflected and distant sound add; a level difference places them all to the left."""
    stream = water()
    reflections = amp(-9.5) * bank_reflections(stream, t60=0.022, apart_db=-14)
    near = coloured(stream + reflections, ditch_db)
    far = far_hum(start_hz=125.5, climb_hz_per_s=5.4) + far_rumble() + far_drone()
    left, right = near + far + knocking()
    left_db = lambda hz: 20 * np.log10(2 / (1 + amp(-along(BALANCE, hz))))
    right_db = lambda hz: left_db(hz) - along(BALANCE, hz)
    return np.array([coloured(left, left_db), coloured(right, right_db)])


def record(dry):
    """Band limiting: a steep low-pass filter removes the highest treble."""
    cutoff_hz = 16250
    m = next_fast_len(N + SR // 2)
    passband = 1 / (1 + (np.fft.rfftfreq(m, 1 / SR) / cutoff_hz) ** 120)
    return irfft(rfft(dry, m) * passband, m)[:, :N]


dry = scene()
out = record(dry)
master_out(out)
```